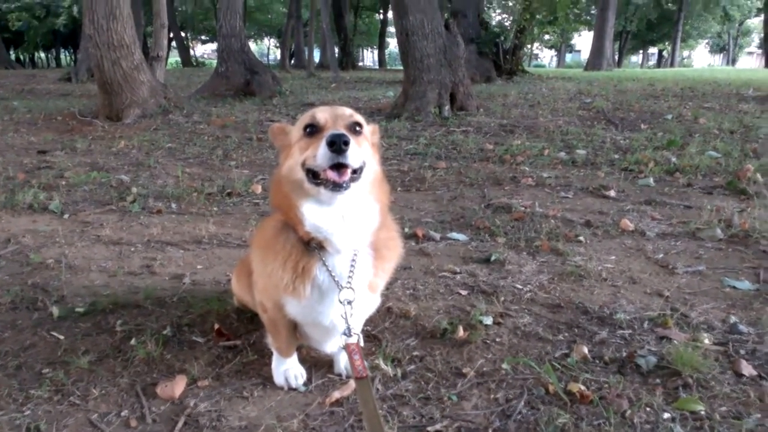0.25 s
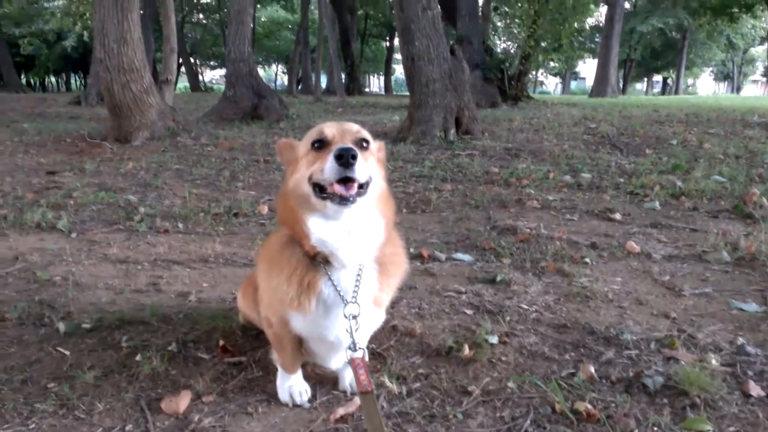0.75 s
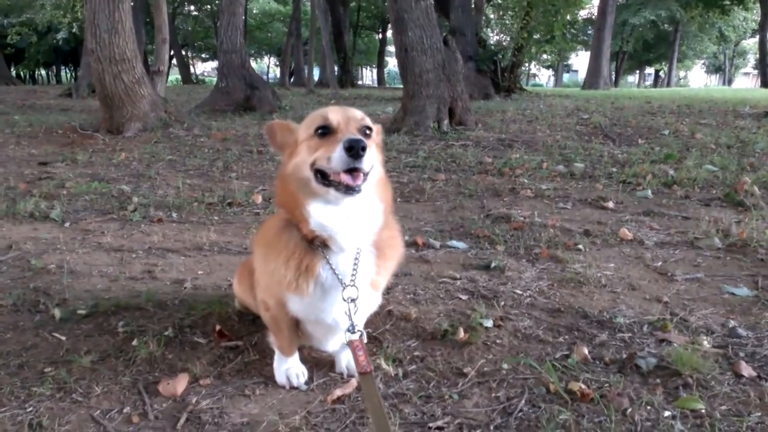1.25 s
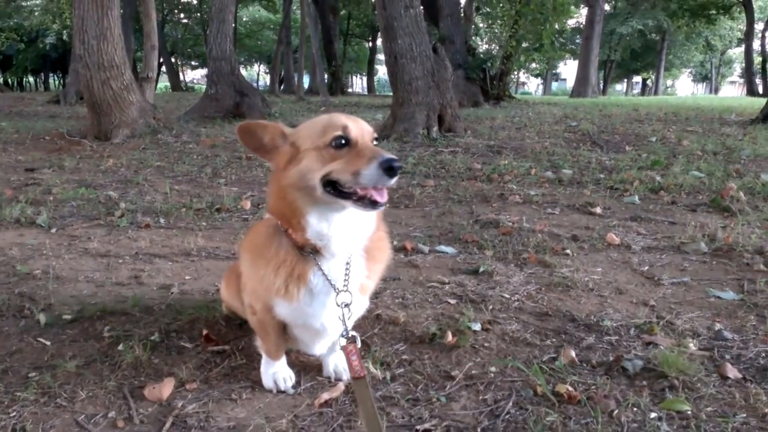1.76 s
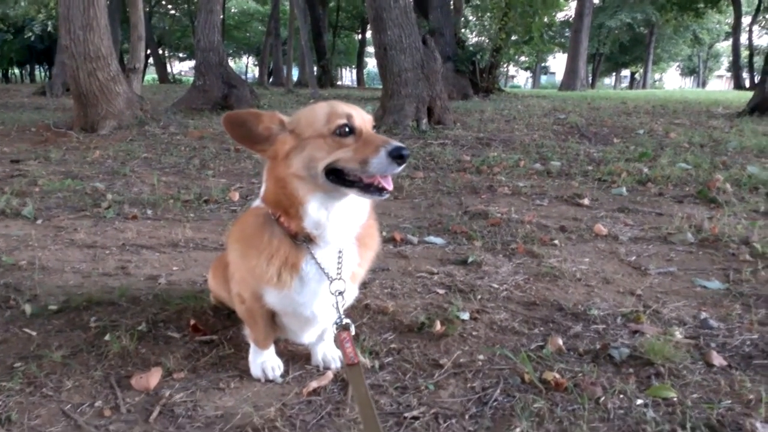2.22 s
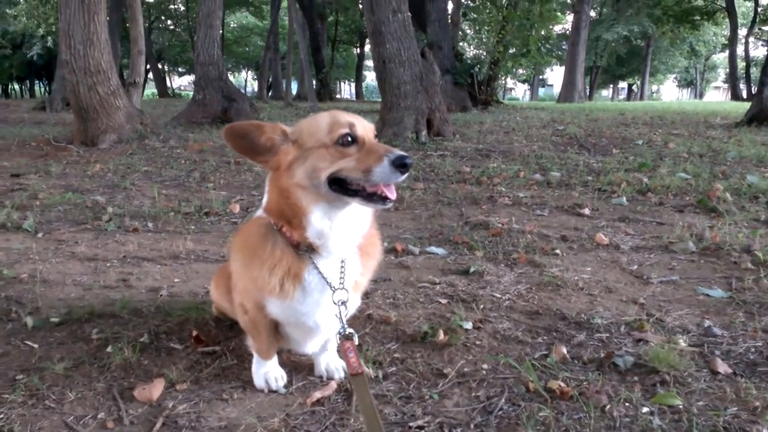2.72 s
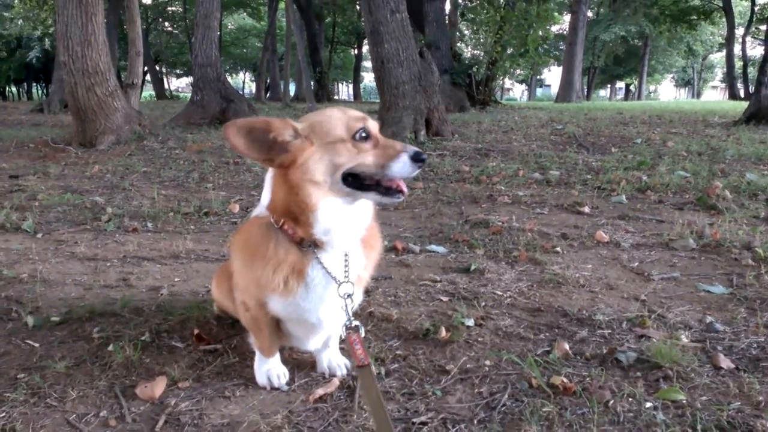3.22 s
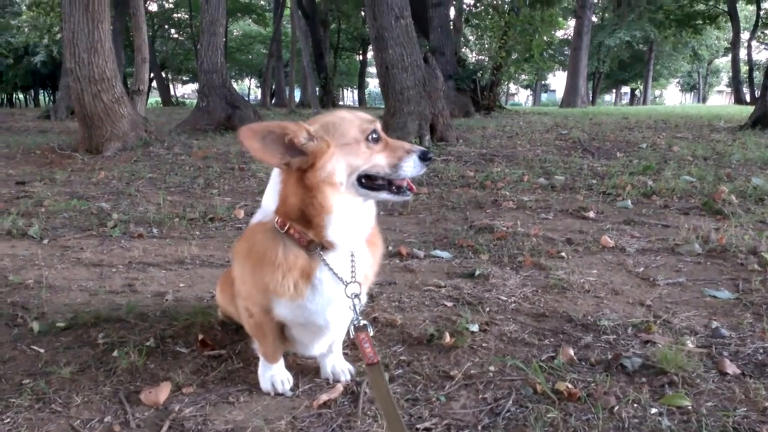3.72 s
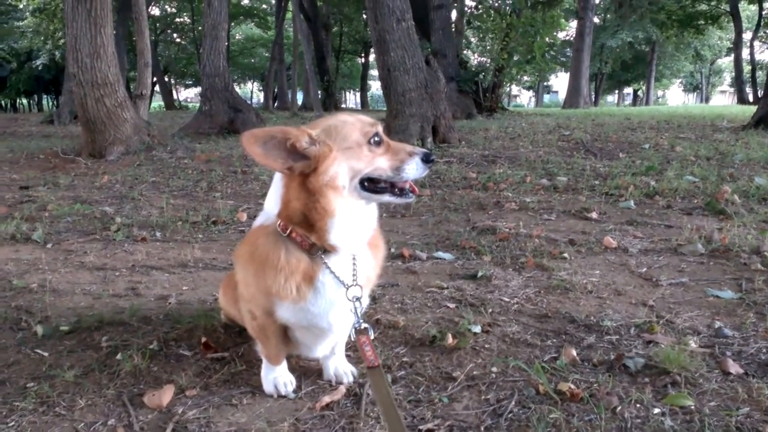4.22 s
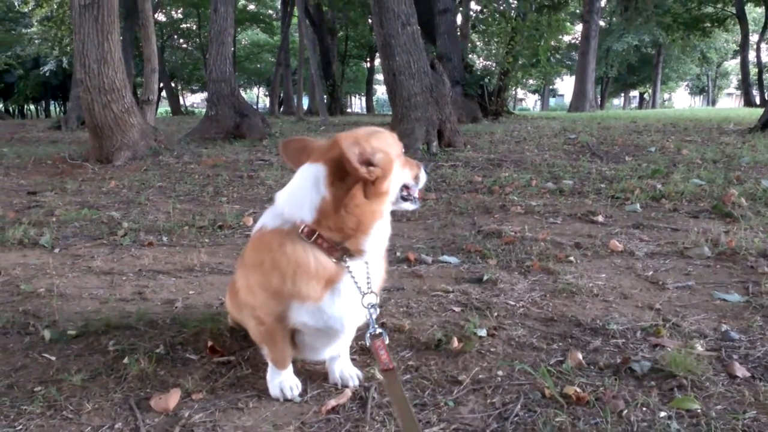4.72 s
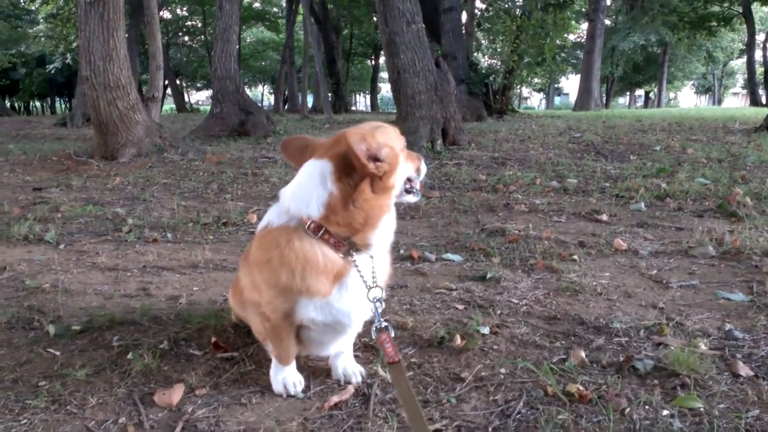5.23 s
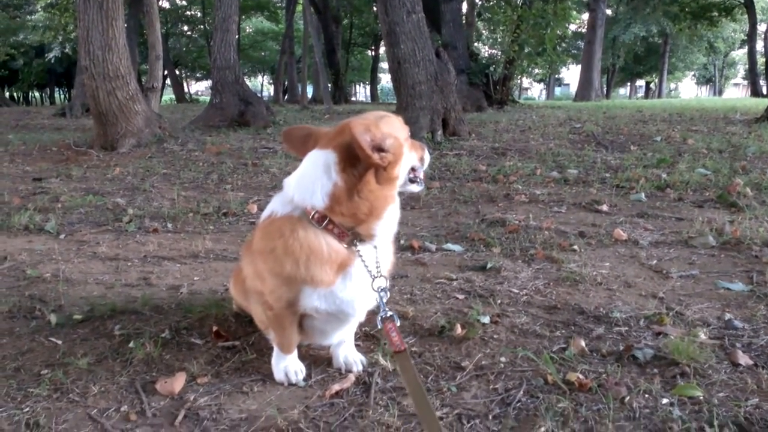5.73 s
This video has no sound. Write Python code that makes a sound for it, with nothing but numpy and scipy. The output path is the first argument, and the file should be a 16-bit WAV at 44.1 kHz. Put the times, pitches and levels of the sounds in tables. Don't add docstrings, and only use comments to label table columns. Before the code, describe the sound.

Steady hissing cicada shrill with faint low wind bumps, then a close evening cicada trills about ten ringing notes a second to the end.

```python
import sys
import numpy as np
from scipy import signal
from scipy.fft import rfft, irfft, next_fast_len
from scipy.io import wavfile
from scipy.ndimage import uniform_filter1d

SR = 44100
rng = np.random.default_rng(int(sys.argv[2]) if len(sys.argv) > 2 else 0)


def materialize(psi):
    bounded = np.clip(np.atleast_2d(psi).T, -1, 1)
    quanta = np.round(bounded * 32767).astype(np.int16)
    wavfile.write(sys.argv[1], SR, quanta)


def attenuation_scalar(level_db):
    decades = np.asarray(level_db, float) / 20
    return 10 ** decades


N = 263277

# f/Hz, level per Hz/dB
CHOIR_LEFT = [(1700, -76.5), (2100, -83.5), (2650, -80.5), (3000, -84), (3500, -99.5), (3900, -80),
              (4500, -71.5), (5100, -65.5), (5800, -66), (6500, -65.5), (7200, -67.5), (8200, -67),
              (9200, -77.5), (10500, -88.5)]
CHOIR_RIGHT = [(1700, -87), (2100, -90), (2650, -82), (3000, -85.5), (3500, -86.5), (3900, -73),
               (4500, -60.5), (5100, -57.5), (5800, -62), (6500, -72), (7200, -81.5), (8200, -85),
               (9200, -105), (10500, -97)]
# t/s, left level/dB, right level/dB
CHOIR_SWELL = [
    (0.0, -0.5, 0.5),
    (5.97, 0.5, 1.5),
]
# t/s, dip level/dB, level after restart/dB
FALTERS = [(.11, -1, 5.5), (.3, -4, 3.5), (0.501, -6.5, 0), (.67, -12.5, -2), (0.911, -9, 1),
           (1.111, -5, 3), (1.38, -7.5, 1.5), (1.48, -6, -2.5), (1.62, -6.5, 6), (1.93, -8, 1),
           (2.419, -9, -0.5), (2.78, -5, -1.5), (2.99, -8, 0.5), (3.172, -8, -0.8), (3.36, -3, 2.5),
           (4.03, -7.5, 1), (4.73, -4.5, -0.5), (5.02, -7, 3), (5.32, -9, -2), (5.601, -2.5, 3.5)]
FALTER_S, RESTART_S, SETTLE_S = .03, .035, .2

# f/Hz, level per Hz/dB
HUM_LEFT = [(40, -100), (70, -71), (105, -74.5), (160, -78.5), (250, -81.5), (400, -84.5), (700, -89.5),
            (1100, -87.5), (1700, -91), (2300, -87)]
HUM_RIGHT = [(40, -73), (70, -77.5), (105, -73), (160, -80.5), (250, -81), (400, -87.5), (700, -92),
             (1100, -88.5), (1700, -91), (2300, -84.5)]
# f/Hz, likeness/-1 to 1
HUM_LIKENESS = [(40, 0.079), (130, -0.48), (290, -0.74), (640, -0.29), (960, -0.14), (1420, 0.051),
                (2100, 0.26)]

# t/s, peak level/dB, f/Hz, left-right level/dB, length/s
GUSTS = [(1.13, -48.5, 86.5, -19, 0.054), (1.37, -49, 110, -24, 0.045), (1.938, -49.5, 104, 9, 0.048),
         (2.349, -38, 106, -28, 0.044), (2.374, -34, 99.6, -31, 0.036), (2.451, -34, 153, -30, 0.027),
         (2.628, -40.5, 94, -27, 0.052), (2.715, -50, 108, -14, 0.041), (2.768, -46, 86.5, -17, 0.03),
         (2.91, -50, 99, -4, 0.036), (3.718, -45.5, 110, -9, 0.032), (3.754, -49, 82.5, -24, 0.019),
         (3.839, -45, 90, -11, 0.035), (3.898, -49, 94, -3.5, 0.03), (4.897, -53, 137, 4.5, 0.018),
         (5.099, -51, 84, 11, 0.034), (5.283, -40, 99, 18, 0.057), (5.658, -46, 103, 13, 0.023)]
WIND_DB, WIND_PAN_DB = -59, -3
SWELL_DB, SWELL_S = -12, .06

# t/s, second harmonic level/dB, fourth harmonic level/dB
WARM_UP = [
    (2.656, -49, -54),
    (2.745, -29.5, -48),
    (2.832, -26, -46),
    (2.923, -21.5, -49),
    (3.004, -19, -47),
]
# t/s, second harmonic level/dB, fourth harmonic level/dB
TRILL = [(3.099, -18.5, -39.5), (3.192, -19.5, -46.5), (3.287, -16.5, -37.5), (3.382, -16.5, -34.5),
         (3.475, -18, -35.5), (3.57, -17.5, -36.5), (3.667, -19, -40), (3.762, -16.5, -39),
         (3.856, -16, -33.5), (3.955, -17, -37.5), (4.051, -18.5, -32.5), (4.149, -18.5, -37.5),
         (4.25, -16.5, -39.5), (4.348, -17, -36), (4.447, -19.5, -41), (4.545, -21, -37), (4.643, -19, -40),
         (4.746, -21, -37.5), (4.836, -19, -36.5), (4.935, -17.5, -35), (5.037, -18.5, -30.5),
         (5.139, -19, -32.5), (5.239, -20, -37), (5.34, -18.5, -33), (5.436, -20.5, -34),
         (5.538, -21, -31.5), (5.627, -20.5, -31), (5.729, -21, -31), (5.827, -21, -28),
         (5.917, -20.5, -29.5)]
# t/s, body pitch f/Hz, note length/s
TENSION = [
    (2.655, 2095, .025),
    (3.005, 2148, .025),
    (3.1, 2163, .031),
    (3.29, 2190, .032),
    (3.57, 2199, .038),
    (3.86, 2187, .038),
    (4.35, 2179, .035),
    (4.94, 2168, .033),
    (5.92, 2166, .034),
]
# multiple of body pitch, shift f/Hz, left level/dB, right level/dB, growth/dB per s, fuzz/0-1.5
BODY = [(1, 2, -2.5, .5, -40, .15), (1, 645, -28, -24, 0, .3), (3, 0, -7, -9, 0, .3)]
UNDERTONE = [(1, -326, -50, -62, -60, .3)]
SECOND = [(2, 4, 1, 1, 90, .11), (0, 3965, -19, -18.5, 40, .7), (2, -200, -21, -25, 0, 1.5),
          (2, 335, -9, -15, 0, .5)]
FOURTH = [(4, 5, -1, -15, -250, .22), (4, -335, -5, -20, -500, .35), (4, 335, -12, -26, -500, .3)]
# t/s, level/dB
SECOND_LEFT = [(2.7, -15), (3.3, -19), (3.8, -22), (4.3, -15.5), (4.8, -12.5), (5.4, -12.5), (6, -11)]
BODY_DB, BODY_FULL_S, BODY_RISE_DB_PER_S = -35, 3.09, 27
BODY_LEFT_DB_PER_S = -1.5

# f/Hz, t60/s
TREES = [(1500, .3), (4000, .35), (9000, .25)]
ECHO_DB, SPILL = -11, .1

# t/s, length/s, start f/Hz, fall f/Hz, level/dB
CHEEPS = [
    (3.38, .03, 3450, 40, -54),
    (3.572, .028, 3430, 50, -51),
    (4.84, .05, 3560, 400, -50),
]

LOW_CUT_HZ = 48.3


def evened(x):
    return x / np.sqrt(np.mean(x ** 2) + 1e-20)


def read(points, hz):
    f, value = np.transpose(points)
    return np.interp(np.log(hz + 1), np.log(f + 1), value)


def follow(rows, column=1):
    rows = np.array(rows)
    return np.interp(np.arange(N) / SR, rows[:, 0], rows[:, column])


def add(mix, s, sound):
    start = round(s * SR)
    part = mix[..., start:start + sound.shape[-1]]
    part += sound[..., :part.shape[-1]]


def colour(x, gain):
    size = next_fast_len(N)
    hz = np.fft.rfftfreq(size, 1 / SR)
    return irfft(rfft(x, size) * gain(hz) * np.sqrt(SR / 2), size)[..., :N]


def wobble(hz, shape):
    size = int(SR / hz)
    once = uniform_filter1d(rng.standard_normal(shape), size)
    return evened(uniform_filter1d(once, size))


def port_levels(db, pan_db):
    return attenuation_scalar(db + np.minimum([[pan_db], [-pan_db]], 0))


def singers(rib_hz, spread_db, far_db, count):
    out = attenuation_scalar(far_db) * np.sqrt(count * rib_hz / SR) * rng.standard_normal(N)
    for _ in range(count):
        rate = rib_hz * rng.uniform(.6, 1.3) * (1 + .12 * wobble(300, N))
        turns = np.cumsum(rate) / SR
        clicks = np.diff(np.floor(turns), prepend=0) * rng.choice([-1, 1], N)
        out = out + clicks * attenuation_scalar(spread_db * rng.standard_normal(N))
    return evened(out)


def faltering():
    t, out = np.arange(N) / SR, np.zeros(N)
    for s, depth_db, after_db in FALTERS:
        back = np.clip((t - s) / RESTART_S, 0, 1)
        out += depth_db * (1 - back) * np.exp(np.minimum(t - s, 0) / FALTER_S)
        out += after_db * back * np.exp(-np.maximum(t - s, 0) / SETTLE_S)
    return out


def choir():
    def high(hz):
        return np.clip((hz - 6300) / 1100, 0, 1)

    def above_hum(hz):
        return np.clip((hz - 1700) / 600, 0, 1)

    def left_steady(hz):
        return attenuation_scalar(read(CHOIR_LEFT, hz)) * above_hum(hz) * np.sqrt(1 - high(hz))

    def left_high(hz):
        return attenuation_scalar(read(CHOIR_LEFT, hz)) * np.sqrt(high(hz))

    def right_all(hz):
        return attenuation_scalar(read(CHOIR_RIGHT, hz)) * above_hum(hz)

    throb = evened(attenuation_scalar(faltering()))
    left = colour(singers(300, 2.1, 0.77, count=8), left_steady)
    left += throb * colour(singers(340, 4.5, 1.0, count=5), left_high)
    right = colour(singers(300, 2.3, 1, count=8), right_all)
    swell_db = [follow(CHOIR_SWELL, column=c) + 0.6 * wobble(41, N) for c in (1, 2)]
    return attenuation_scalar(np.array(swell_db)) * [left, right]


def hum():
    def below_choir(hz):
        fade_out = np.sqrt(1 - np.clip((hz - 1700) / 600, 0, 1) ** 2)
        return fade_out * np.clip((hz - 60) / 140, .2, 1)

    def same(hz):
        return np.clip(read(HUM_LIKENESS, hz), -1, 1)

    def right_gain(hz):
        return attenuation_scalar(read(HUM_RIGHT, hz)) * below_choir(hz)

    shared, own = rng.standard_normal((2, N))
    left = colour(shared, lambda hz: attenuation_scalar(read(HUM_LEFT, hz)) * below_choir(hz))
    right = colour(shared, lambda hz: right_gain(hz) * same(hz))
    right += colour(own, lambda hz: right_gain(hz) * np.sqrt(1 - same(hz) ** 2))
    return np.array([left, right])


def wind():
    def hump(hz):
        return 1 / (1 + (np.log(hz / 100 + 1e-9) / .5) ** 4)

    lumps = attenuation_scalar(1.4 * wobble(13, (2, N))) * rng.standard_normal((2, N))
    rumble = evened(colour(lumps - 0.27 * lumps[::-1], hump))
    t = np.arange(N) / SR
    power = attenuation_scalar(WIND_DB + np.array([[WIND_PAN_DB], [-WIND_PAN_DB]]) / 2) ** 2
    for s, db, hz, pan_db, length in GUSTS:
        swell = np.exp(-((t - s - length / 2) / SWELL_S) ** 2)
        power = power + port_levels(db + SWELL_DB, pan_db) ** 2 * swell
    return np.sqrt(power) * rumble


def gusts():
    def low_puff(hz):
        return np.clip(hz / 70, 0, 1) ** 2 / (1 + (hz / 190) ** 6)

    out = np.zeros((2, N))
    puff = evened(colour(rng.standard_normal(N), low_puff))
    for s, db, hz, pan_db, length in GUSTS:
        t = np.arange(0, length, 1 / SR)
        push = np.sin(2 * np.pi * hz * t * (1 + 3 * t))
        push = push + 0.84 * puff[round(s * SR):][:len(t)]
        add(out, s, port_levels(db, pan_db) * np.sin(np.pi * t / length) ** 2 * push)
    return out


def lines(table, hz, length, lead, tail, sag):
    t = np.arange(-lead, length + 5 * tail, 1 / SR)
    rise = np.sin(np.pi / 2 * np.clip((t + lead) / .011, 0, 1))
    gate = rise * np.exp(-np.maximum(t - length, 0) / tail)
    from_middle = np.minimum(t, length) - length / 2
    out = np.zeros((2, len(t)))
    for multiple, shift_hz, left_db, right_db, growth_db, fuzz in table:
        pitch = multiple * hz * (1 - sag * from_middle) + shift_hz
        shaky = 1 + fuzz * (wobble(300, len(t)) + 1j * wobble(300, len(t)))
        turns = np.cumsum(pitch) / SR + rng.random()
        tone = (shaky * np.exp(2j * np.pi * turns)).real * np.sqrt(2)
        out += attenuation_scalar(np.array([[left_db], [right_db]]) + growth_db * from_middle) * gate * tone
    return out


def evening_cicada():
    out = np.zeros((2, N))
    opposed = np.array([[-1], [1]])
    tension_s, pitch_hz, length_s = np.transpose(TENSION)
    for s, second_db, fourth_db in WARM_UP + TRILL:
        hz = np.interp(s, tension_s, pitch_hz)
        length = np.interp(s, tension_s, length_s)
        body_db = BODY_DB + BODY_RISE_DB_PER_S * min(s - BODY_FULL_S, 0)
        body_turn_db = np.array([[BODY_LEFT_DB_PER_S * (s - BODY_FULL_S)], [0]])
        second_turn_db = np.array([[np.interp(s, *np.transpose(SECOND_LEFT))], [0]])

        body = attenuation_scalar(body_db + body_turn_db) * lines(BODY, hz, length, .005, .005, .14)
        undertone = lines(UNDERTONE, hz, length - .004, .005, .008, 0)
        second = attenuation_scalar(second_db + second_turn_db) * lines(SECOND, hz, length - .002, 0, .007, .14)
        fourth = attenuation_scalar(fourth_db) * lines(FOURTH, hz, length - .008, .002, .016, .03)

        undertone = np.pad(undertone, ((0, 0), (0, SR)))[:, :body.shape[1]]
        add(out, s - .005, opposed * (body + undertone))
        add(out, s, opposed * second)
        add(out, s - .002, fourth)
    return out


def trees(x):
    taps = np.zeros((2, SR // 2))
    slots = np.arange(400, SR // 2 - 20, 20)
    at = slots + rng.integers(0, 20, (2, (SR // 2 - 401) // 20))
    np.put_along_axis(taps, at, rng.choice([-1., 1.], at.shape), 1)
    hz, t, z = signal.stft(taps, SR, nperseg=256)
    decay = attenuation_scalar(-60 * t / read(TREES, hz)[:, None])
    tail = signal.istft(z * decay, SR, nperseg=256)[1]
    tail[1] = .6 * tail[0] + .8 * tail[1]
    return signal.fftconvolve(x, tail / np.linalg.norm(tail[0]), axes=1)[:, :N]


def bird():
    out = np.zeros((2, N))
    for s, length, hz, fall_hz, db in CHEEPS:
        u = np.arange(0, length, 1 / SR) / length
        tone = np.sin(np.pi * u) * np.sin(2 * np.pi * np.cumsum(hz - fall_hz * u) / SR)
        add(out, s, attenuation_scalar(db + np.array([[-14], [0]])) * tone)
    return out


def scene():
    solo = evening_cicada()
    echoes = attenuation_scalar(ECHO_DB) * trees(np.array([solo[0] - SPILL * solo[1], solo[1]]))
    return choir() + hum() + wind() + gusts() + solo + echoes + bird()


def low_pass(x):
    return signal.sosfilt(signal.butter(12, 10680, fs=SR, output="sos"), x)


def record(dry):
    low_cut = signal.butter(3, LOW_CUT_HZ, "highpass", fs=SR, output="sos")
    mix = signal.sosfilt(low_cut, dry)
    return low_pass(mix)


dry = scene()
out = record(dry)
materialize(out)
```